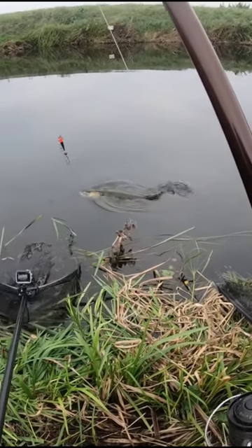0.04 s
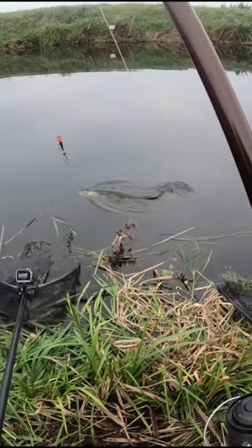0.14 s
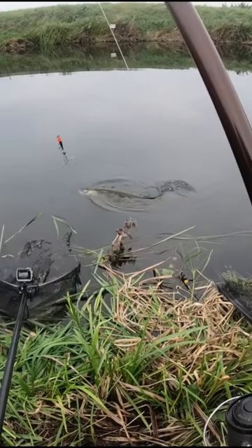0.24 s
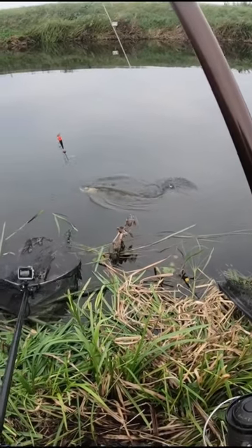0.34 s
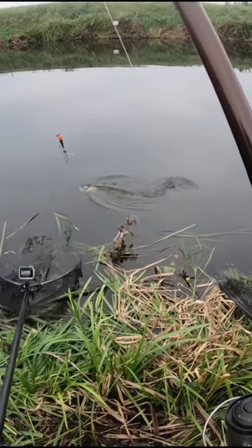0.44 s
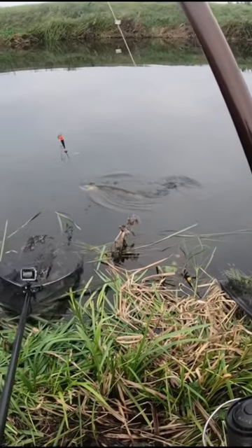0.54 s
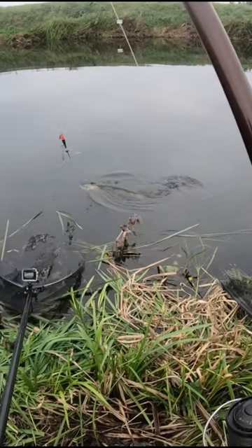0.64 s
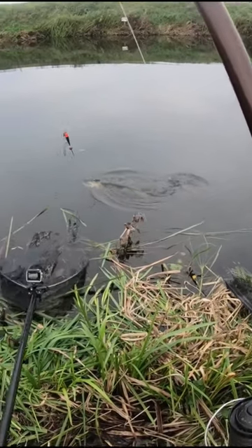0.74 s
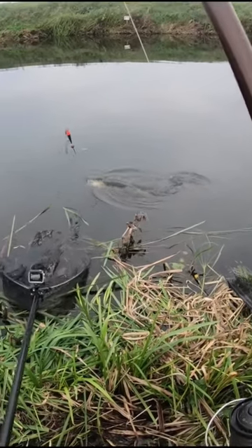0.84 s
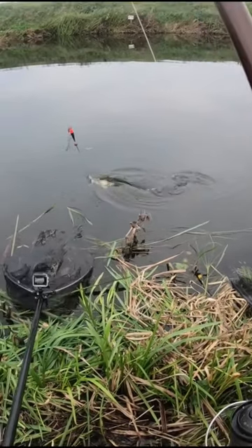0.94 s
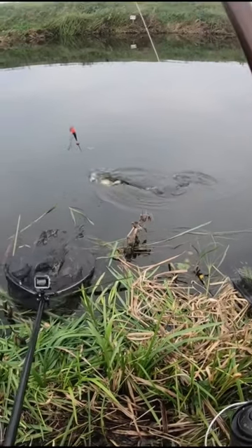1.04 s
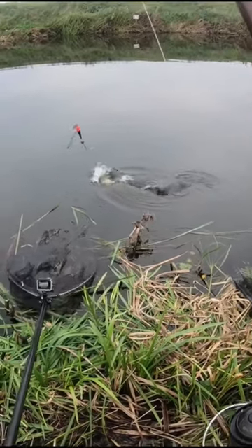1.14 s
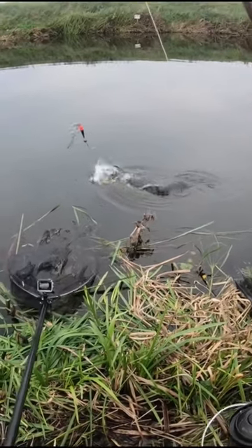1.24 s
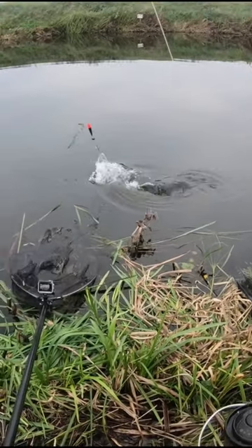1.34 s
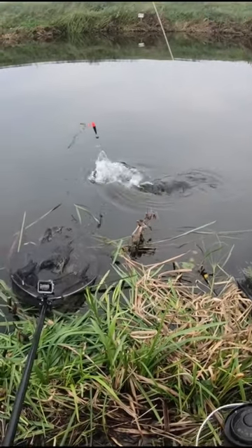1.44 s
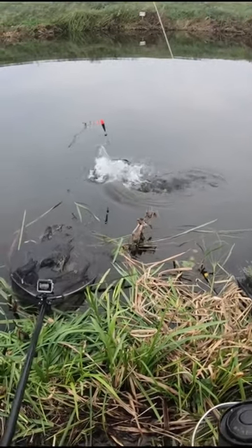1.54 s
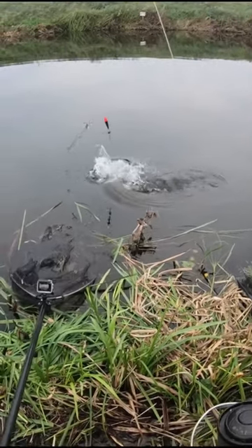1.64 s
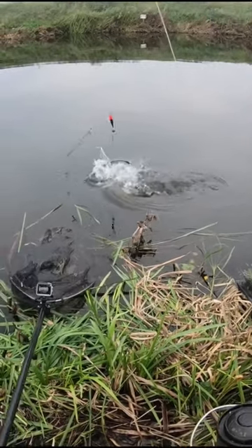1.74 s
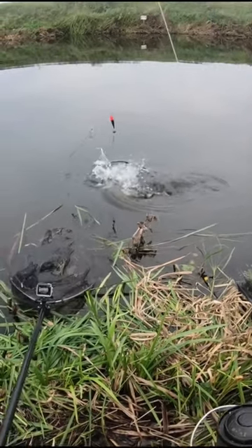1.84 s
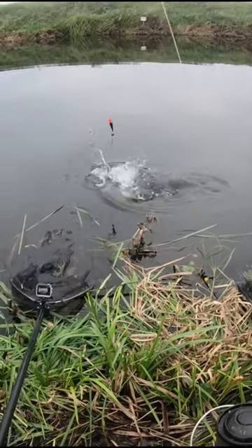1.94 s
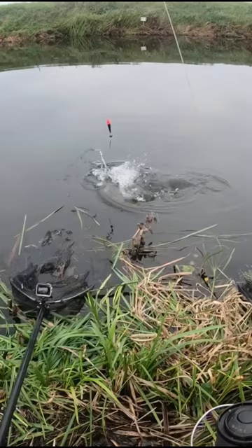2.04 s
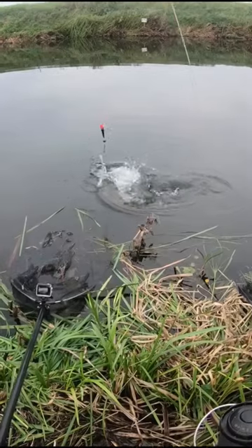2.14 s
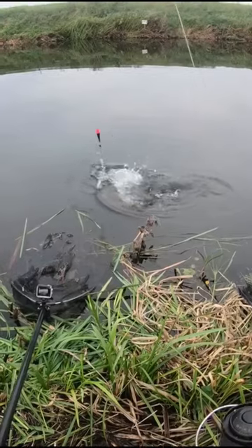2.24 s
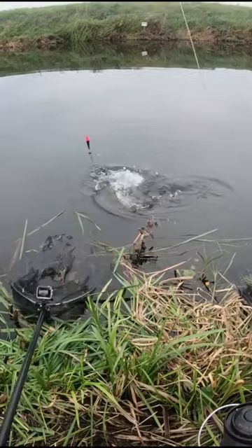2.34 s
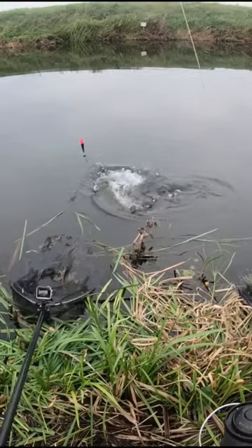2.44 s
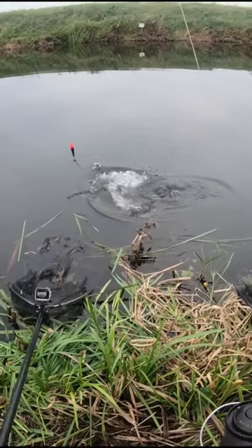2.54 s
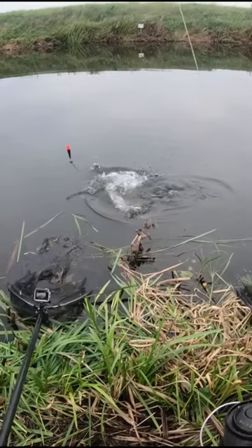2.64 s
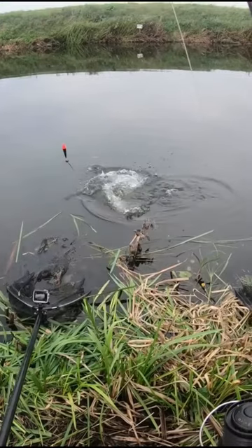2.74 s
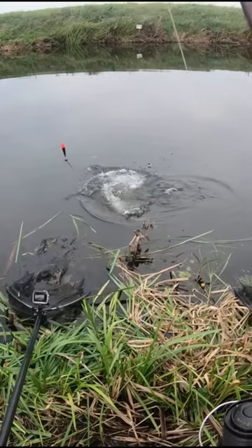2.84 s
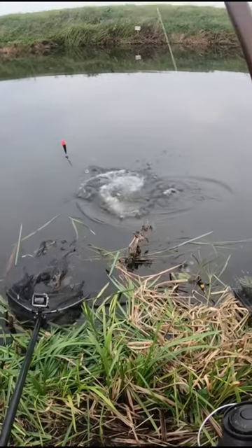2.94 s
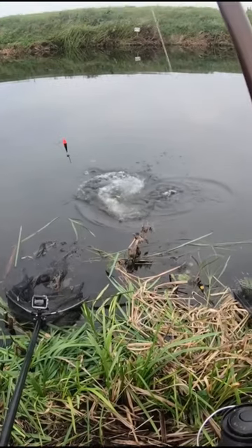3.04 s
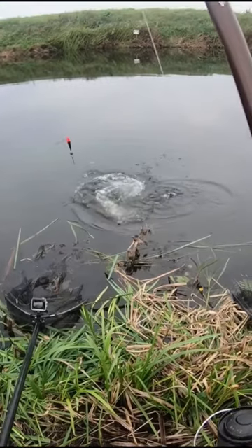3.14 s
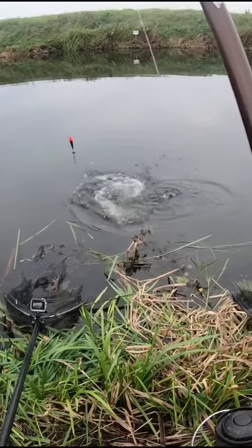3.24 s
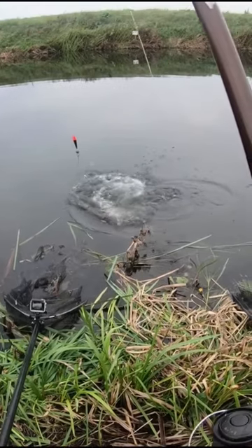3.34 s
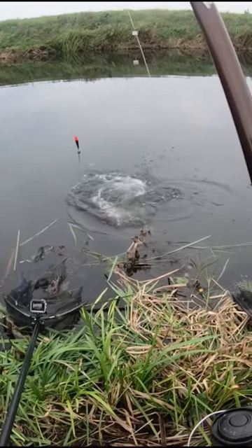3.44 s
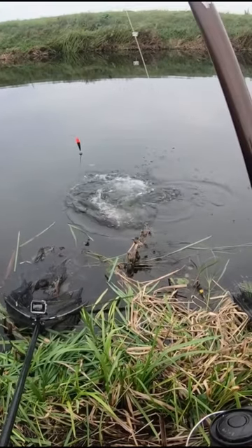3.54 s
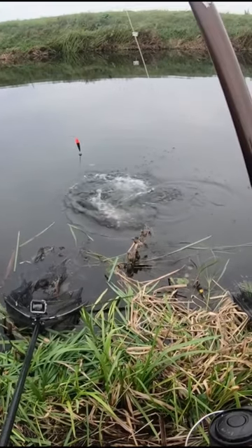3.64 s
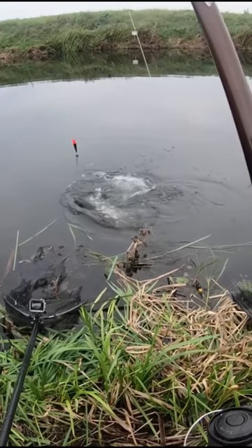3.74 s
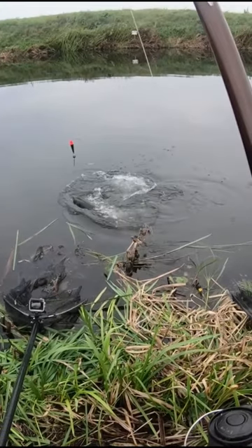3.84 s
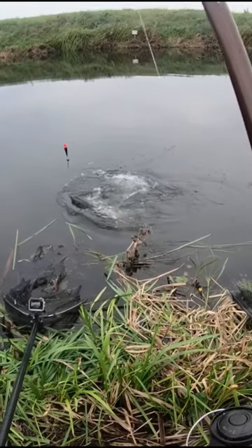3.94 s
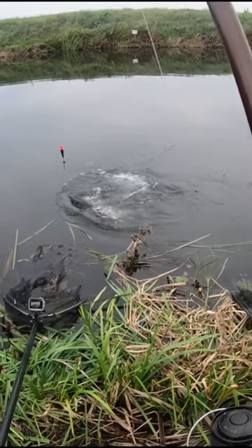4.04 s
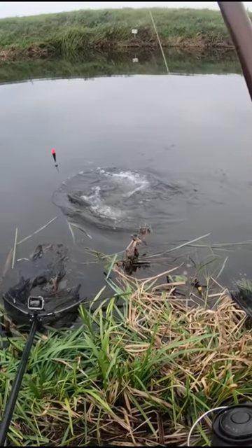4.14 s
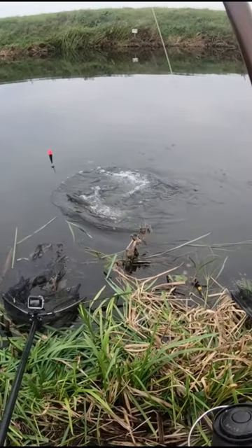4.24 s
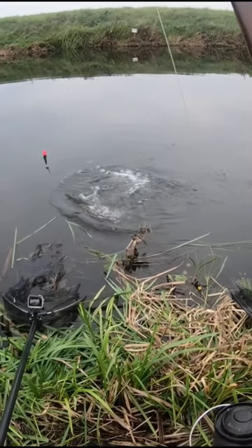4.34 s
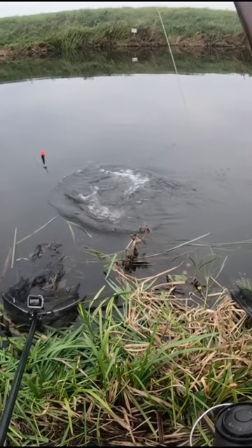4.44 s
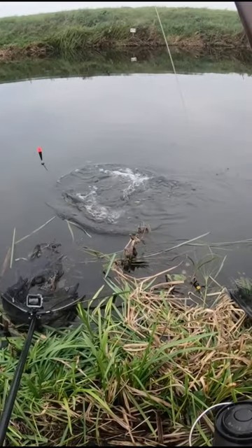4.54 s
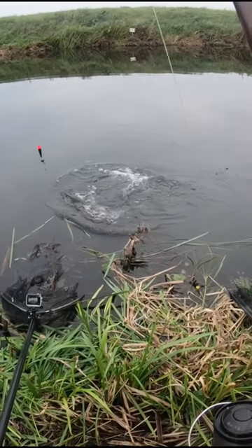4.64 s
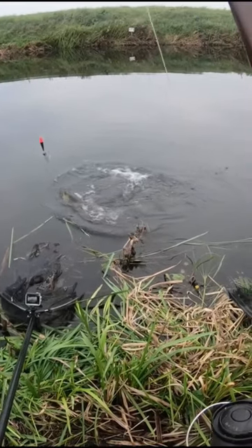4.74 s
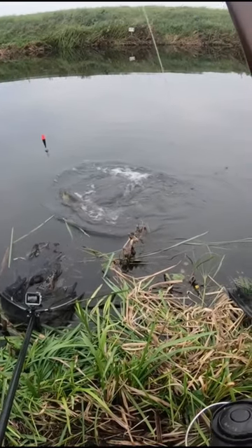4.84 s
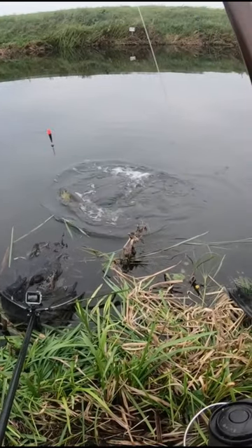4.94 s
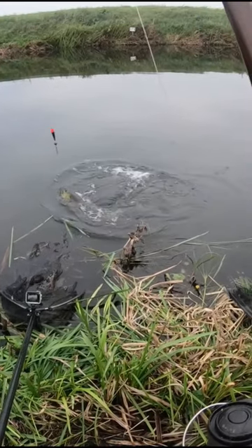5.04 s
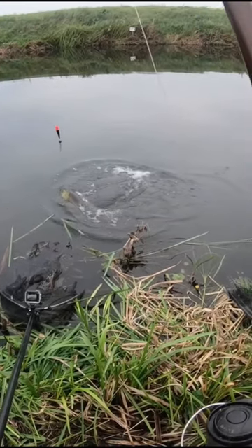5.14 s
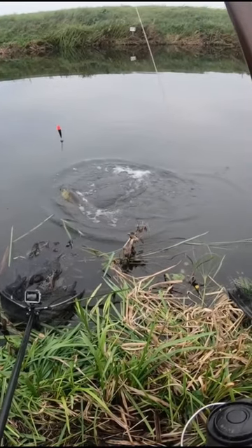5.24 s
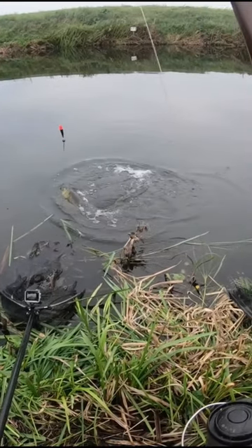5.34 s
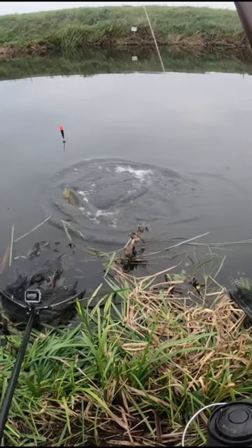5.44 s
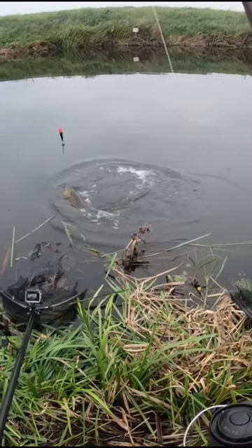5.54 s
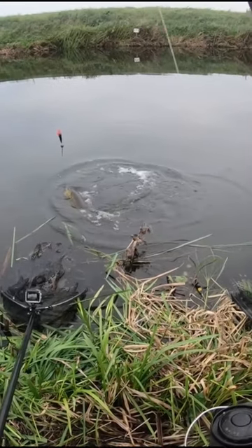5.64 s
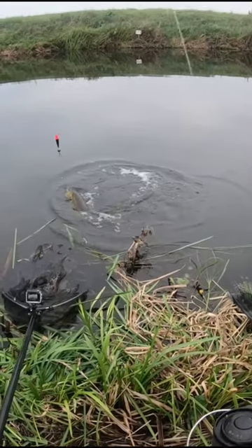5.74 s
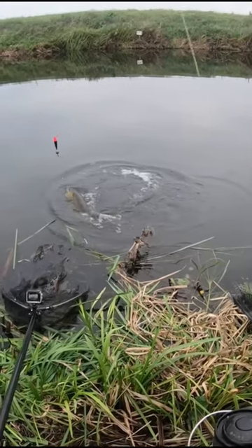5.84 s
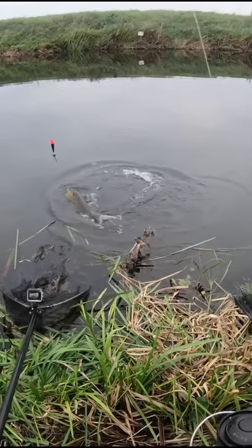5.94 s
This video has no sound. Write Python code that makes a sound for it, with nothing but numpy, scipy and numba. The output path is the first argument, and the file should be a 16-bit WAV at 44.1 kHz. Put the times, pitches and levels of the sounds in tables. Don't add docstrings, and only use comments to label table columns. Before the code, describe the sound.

Boxy, dull water sounds: faint outdoor hush, sudden violent slaps and churning froth from a fish, then bubbling that settles to quiet.

```python
import sys
import numpy as np
from scipy import signal
from scipy.fft import rfft, irfft, next_fast_len
from scipy.io import wavfile
from scipy.ndimage import uniform_filter1d
from numba import njit

SR = 44100
rng = np.random.default_rng(int(sys.argv[2]) if len(sys.argv) > 2 else 0)


def wrap_up_sound(samples):
    columns = np.atleast_2d(samples).T
    tamed = np.clip(columns, -1, 1)
    steps = np.round(tamed * 32767).astype(np.int16)
    wavfile.write(sys.argv[1], SR, steps)


def makeup_ratio(level_db):
    decades = np.asarray(level_db, float) / 20
    return 10 ** decades


N = 264159
TIME = np.arange(N) / SR
SIZE = 2 * next_fast_len(N // 2 + 1)
HZ = np.maximum(np.fft.rfftfreq(SIZE, 1 / SR), .1)

# (frequency [Hz], level per Hz [dB])
HOUSING = [(18, -31), (32, -3), (95, -4), (130, -11), (165, -9), (277, -12.5), (324, -21), (385, -14),
           (467, -20.5), (868, -17.5), (1050, -29.5), (1490, -26.5), (1810, -29), (2070, -42),
           (3050, -53.5), (3600, -56), (4000, -65.5), (4250, -72), (4500, -105)]
# (frequency [Hz], level per Hz [dB])
TREBLE = [(6000, -70), (7700, -32), (8000, -14), (9900, -10), (10200, 0), (10600, -3), (10900, -9),
          (11100, -4), (11700, -18), (12000, -32), (12500, -14), (12900, -7), (13200, -12), (13650, -5),
          (14400, -16)]


def along(table):
    hz, value = np.transpose(table)
    return np.interp(np.log(HZ), np.log(np.maximum(hz, 1)), value)


def causal(table):
    cepstrum = irfft(along(table) * np.log(10) / 20, SIZE)
    cepstrum[1:SIZE // 2] *= 2
    cepstrum[SIZE // 2 + 1:] = 0
    return np.exp(rfft(cepstrum))


def shaped(x, response):
    return irfft(rfft(x, SIZE) * response, SIZE)[..., :N]


def level(x, db):
    return x * makeup_ratio(db) / np.sqrt(np.mean(x ** 2))


def walk(rate):
    k = int(SR / rate)
    held = np.repeat(rng.standard_normal(N // k + 1), k)
    steps = uniform_filter1d(uniform_filter1d(held, k), k)[:N]
    return steps / steps.std()


def tents(s, db, rise, fall):
    late = TIME[::32] - np.array(s)[:, None]
    slope_db = np.where(late < 0, -rise * late, fall * late)
    gain = makeup_ratio(np.array(db)[..., None] - slope_db)
    total = np.sqrt(np.sum(gain ** 2, axis=-2))
    return uniform_filter1d(np.repeat(total, 32, axis=-1), 64)[..., :N]


def hush():
    # (frequency [Hz], level per Hz [dB])
    air_shape = [(22, -16.5), (31, -1.5), (45, -2), (56, -16.5), (75, -19), (130, -34), (190, -28.5),
                 (260, -31.5), (400, -38), (700, -40), (1200, -41.5), (1550, -37), (2000, -48.5),
                 (3000, -55.5), (3700, -71.5), (4500, -74)]
    # (frequency [Hz], likeness [-1 to 1])
    air_alike = [(40, .1), (100, -.1), (180, -.5), (300, -.5), (520, -.1), (890, .5), (1520, .3), (2600, 0)]
    alike = along(air_alike)
    colour = makeup_ratio(along(air_shape))
    mid = shaped(rng.standard_normal(N), colour)
    side = shaped(rng.standard_normal(N), colour * np.sqrt((1 - alike) / (1 + alike)))
    air = np.array([mid + side, mid - side]) * makeup_ratio(-53 + .6 * walk(3)) / mid.std()
    hiss = shaped(rng.standard_normal((2, N)), makeup_ratio(np.maximum(along(TREBLE), -13) / 8))
    return air + level(hiss, -96)


@njit
def ring(n, s, hz, size, swell, t60, rise):
    out = np.zeros(n)
    for k in range(len(s)):
        start = int(s[k] * SR)
        z, step = 1 + 0j, 2 * np.pi * hz[k] / SR
        fade, climb = np.exp(-np.log(1000) / (t60[k] * SR)), 2 ** (rise[k] / SR)
        grow = max(swell[k] * SR, 1.)
        for i in range(min(int(grow + 1.4 * t60[k] * SR), n - start)):
            if i % 8 == 0:
                turn = np.exp(1j * min(step, 2.8))
            z *= turn if i < grow else turn * fade
            step *= climb
            out[start + i] += size[k] * z.imag * np.sin(np.pi / 2 * min(i / grow, 1.)) ** 2
    return out


def gurgles():
    # (time [s], start pitch [Hz], peak level [dB], life [s], rise [octaves/s])
    slow_pockets = [(.0, 172, -59.5, .165, 6.3), (.0, 505, -64.5, .065, 5), (.908, 390, -39, .018, 5),
                    (1.186, 600, -36, .024, 30), (1.253, 224, -36, .022, 10), (1.268, 215.4, -35, .03, 14),
                    (1.283, 330, -36, .018, 14), (1.8, 66, -38, .13, 2.5), (2.03, 225, -40, .07, 6.8),
                    (2.2, 183, -45, .08, 3), (2.395, 180, -39, .062, 12), (2.93, 260, -52, .05, 4),
                    (3.57, 205, -59, .1, 2.5), (3.755, 815, -53, .028, 3), (3.932, 371, -61, .075, 3),
                    (4.03, 178.5, -57, .06, .7), (4.095, 182, -59, .075, 3), (4.15, 215, -64, .05, 3.3),
                    (4.49, 302, -67, .04, 50), (4.7, 20, -38, .36, 0.11), (5.47, 40, -52, .2, 1.2)]
    lean, flat = .7, .8
    out = np.zeros(N)
    for s, hz, db, life, rise in slow_pockets:
        t = np.arange(int(life * SR)) / SR
        shape = np.sin(np.pi * (t / life) ** lean) ** flat
        tone = np.sin(2 * np.pi * np.cumsum(hz * 2 ** (rise * t)) / SR)
        start = int(s * SR)
        out[start:start + len(t)] += makeup_ratio(db) * shape * tone
    return out


def bubbles():
    # (time [s], start pitch [Hz], peak level [dB], T60 [s], rise [octaves/s])
    large = [(.0, 841, -55, 0.077, 0.77), (.97, 1397, -39, 0.04, 3.7), (1.113, 554, -29.5, .016, 80),
             (1.139, 583, -30, 0.024, 40), (.932, 517, -38.5, .015, 79), (1.233, 1486, -41.5, 0.033, 3),
             (1.286, 1474, -39.5, 0.025, 3), (1.349, 544, -31, .018, 70), (2.69, 955, -42, 0.04, 40),
             (2.888, 702, -46.5, 0.084, 13), (3.139, 542, -48, 0.077, 95), (3.153, 600, -51.5, 0.05, 95),
             (3.228, 165, -58.5, 0.046, 6.8), (3.355, 1315, -50.5, 0.032, 140),
             (3.459, 181, -58, 0.051, 4.3), (2.902, 1295, -47, .02, 50), (2.062, 650, -39.5, .025, 30),
             (2.557, 701, -45, 0.022, 40), (4.302, 386, -57.5, 0.037, 3.7), (4.34, 347, -64, 0.073, 6),
             (4.074, 638, -50.5, 0.024, 40), (4.437, 643, -57, 0.037, 60), (4.882, 578, -57.5, 0.1, 11)]
    # (time [s], pitch [Hz], peak level [dB])
    small = [(.455, 902, -62.5), (.845, 390, -60), (.921, 1050, -46), (.956, 1000, -43), (.972, 1130, -43),
             (1.01, 780, -44), (1.598, 503, -41.5), (1.652, 1450, -45.5), (1.742, 1644, -44.5),
             (2.08, 733, -40.5), (2.512, 1430, -51), (2.588, 873, -45.5), (2.622, 637, -46),
             (2.81, 572, -47), (3.178, 630, -55), (3.485, 1490, -65), (3.6, 905, -64), (3.825, 1880, -67),
             (4.29, 1500, -65), (4.43, 1550, -63.5), (.535, 692, -60), (.855, 586, -55),
             (2.182, 1326, -42.5), (3.284, 1494, -52.5), (3.405, 590, -56), (3.51, 770, -58),
             (3.78, 860, -51), (3.31, 870, -58), (3.455, 1780, -59), (4.01, 610, -63), (4.14, 570, -54.5),
             (4.35, 378, -63), (4.527, 1070, -55), (4.548, 746, -56.5), (4.709, 1740, -59.5),
             (5.141, 1550, -55)]
    pop_cycles, pop_rise_oct_per_s, swell_cycles = 40, 8.1, 3.45
    pops = [(s, hz, db, pop_cycles / hz, pop_rise_oct_per_s) for s, hz, db in small]
    s, hz, db, t60, rise = np.transpose(large + pops)
    quick = ring(N, s, hz, makeup_ratio(db), swell_cycles / hz, t60, rise)

    wobble_hz = 90 * (1 + .4 * np.sin(2 * np.pi * 17 * TIME))
    wobble = makeup_ratio(3.6 * np.sin(2 * np.pi * np.cumsum(wobble_hz) / SR))

    dip = 1 - .5 * np.exp(-(np.log2(HZ / 1170) / .18) ** 2)
    return shaped(wobble * quick + gurgles(), dip / (1 + (HZ / 1974) ** 14))


def swell():
    # (time [s], level [dB], left minus right [dB])
    waves = [(.08, -40, -2), (0.25, -32, -5), (0.5, -35, -4), (0.85, -29, -6), (1.05, -23, -9),
             (1.42, -30, -11), (1.63, -28, -5), (1.8, -26, -6), (1.94, -24, -6), (2.2, -24, -5),
             (2.33, -31, -4), (2.54, -34, -7), (2.72, -39, -5), (3.03, -32, -8), (3.18, -37, -6),
             (3.38, -35, -9), (3.55, -30, -7), (3.81, -35, -10), (3.92, -38, -4), (4.14, -33, -7),
             (4.3, -39, -7), (4.47, -38, -8), (4.64, -37, -9), (4.79, -31, -13), (4.95, -30, -10),
             (5.17, -34, -11), (5.36, -33, -12), (5.6, -28, -7), (5.72, -37, -3), (5.9, -39, -5)]
    # (frequency [Hz], level per Hz [dB])
    wave_shape = [(1.5, -12), (4, 0), (12, -2), (17, -8), (22, -20), (30, -45), (60, -90), (300, -180)]
    s, db, pan_db = np.transpose(waves)
    shared, own = shaped(rng.standard_normal((2, N)), makeup_ratio(along(wave_shape)))
    pair = np.array([np.roll(shared, SR // 50) + .5 * own, shared])
    pair = pair / np.sqrt(uniform_filter1d(pair ** 2, SR // 5, axis=1))
    side_db = db + 2.8 + pan_db * np.array([[.5], [-.5]])
    gain = tents(s, side_db, rise=110, fall=110)
    gain = uniform_filter1d(uniform_filter1d(gain, SR // 20), SR // 20)
    return pair * gain * np.minimum(TIME / .03, 1) ** 2


def slaps():
    # (time [s], peak level [dB], pitch of trapped air [Hz], crack level [dB])
    body = [(0.845, -47, 647, -13), (0.91, -33, 422, -12.5), (.921, -38.5, 458, -6),
            (0.933, -37.5, 630, -14.5), (0.946, -28.5, 441, -7), (0.969, -35.5, 815, -6),
            (0.989, -27.5, 590, -12), (1.085, -23.5, 595, -17.5), (1.097, -31, 728, -11.5),
            (1.141, -36.5, 646, -0.5), (1.189, -36, 595, -4), (1.229, -24, 594, -10),
            (1.275, -28, 558, -6.5), (1.288, -30.5, 398, -5), (1.35, -27.5, 648, -8.5),
            (1.458, -47.5, 820, 4), (1.499, -42, 752, -9.5), (1.557, -40, 514, -13),
            (1.739, -39.5, 700, -10.5), (1.77, -54, 624, -8.5), (1.788, -45.5, 637, 1.5),
            (1.801, -61, 3480, 16.5), (1.882, -40.5, 477, -6), (2.025, -41.5, 746, -2.5),
            (2.062, -38.5, 603, -10), (2.085, -40.5, 756, -7), (2.141, -41.5, 775, -10),
            (2.221, -32, 574, -12), (2.33, -51, 800, 9), (2.398, -53, 588, -6), (1.208, -40, 795, 0),
            (1.259, -32, 418, -9.5), (1.58, -42, 517, -4), (1.632, -41, 601, -0.5),
            (1.929, -45.5, 404, -3.5), (1.971, -42.5, 899, -8.5), (2.174, -41, 518, -4)]
    # (time [s], peak level [dB], pitch of trapped air [Hz], crack level [dB])
    falling = [(2.524, -35, 560, -10), (2.558, -46.5, 816, -1), (2.577, -41.5, 915, -6.5),
               (2.615, -45.5, 774, 4.5), (2.666, -41.5, 925, -3), (2.742, -40.5, 394, -11),
               (2.814, -44, 546, -6), (2.85, -51.5, 644, 7), (2.904, -44.5, 770, 5),
               (2.996, -44, 780, -18.5), (3.089, -49, 606, -0.5), (3.142, -49, 720, -12),
               (3.284, -53, 464, -5), (3.357, -60, 1690, 8.5), (3.509, -54, 490, -9.5),
               (3.565, -61, 760, -9.5), (3.688, -61.5, 780, 5), (3.931, -48.5, 417, -0.5),
               (3.997, -66.5, 1520, 6), (4.039, -50, 580, -10)]
    s, db, hz, crack_db = np.transpose(body + falling)
    counts = [len(body), len(falling)]
    t60 = np.repeat([.02, .055], counts)
    tick_db = np.repeat([-39, -38.5], counts)
    spray_db = crack_db + tick_db + 1.5 * np.resize(rng.standard_normal(size=50), len(s))

    same = np.ones_like(s)
    out = ring(N, s, hz, makeup_ratio(db - 3.5), .0015 * same, t60, 6.1 * same)
    crack = causal(HOUSING) / (1 + (450 / HZ) ** 4) / (1 + (HZ / 2600) ** 3)
    for colour, gain_db, fade_s in ((crack, db + crack_db, .0035), (causal(TREBLE), db + spray_db, .004)):
        blows = np.zeros(N)
        blows[(s * SR).astype(int)] = makeup_ratio(gain_db)
        blows = uniform_filter1d(blows, size=65, origin=-32)
        puffs = signal.lfilter([1], [1, -np.exp(-1 / (fade_s * SR))], blows)
        colour = colour / np.sqrt(np.mean(np.abs(colour) ** 2))
        out = out + shaped(puffs * rng.standard_normal(N), colour)
    return out


def grains(lo_hz, hi_hz, count, cycles, spread_db, glide, wash_db, patchy_db, colour):
    when, pitch, big, long = rng.random((count, 4)).T
    hz = lo_hz * (hi_hz / lo_hz) ** pitch
    t60 = cycles * (.45 + 1.25 * long) / hz
    size = hz * makeup_ratio(-spread_db * np.log(np.maximum(big, .02)))
    cloud = ring(N, when * N / SR, hz, size, .5 / hz, t60, glide / t60)
    band = colour / (1 + (lo_hz / HZ) ** 8) / (1 + (HZ / hi_hz) ** 8)
    cloud = level(shaped(cloud, band), 0)
    wash = level(shaped(rng.standard_normal(N), band), 0)
    ends = np.clip(np.minimum(TIME, TIME[::-1]) / .004, 0, 1)
    return level((cloud + makeup_ratio(wash_db) * wash) * makeup_ratio(patchy_db * walk(22.03)) * ends, 0)


def lulls():
    # (time [s], depth [dB], width [s])
    breaths = [(0.927, 13, 0.0055), (.94, 5, 0.0028), (1.003, 5, .003), (1.064, 5, .004), (1.078, 7, .005),
               (1.106, 12, .005), (1.127, 7, .004), (1.137, 6, .003), (1.163, 6.5, 0.0034),
               (1.182, 6.5, .005), (1.223, 4.5, .003), (1.245, 3, .004), (1.27, 5, .004), (1.343, 5, .007),
               (1.57, 3.5, 0.011), (1.72, 3, 0.0076), (1.96, 3.5, 0.0084), (2.055, 4, 0.0052),
               (2.21, 4.5, 0.0054), (2.265, 6, 0.013), (2.32, 6.5, .006), (2.5, 2, .015), (2.548, 5, .008),
               (2.603, 5, .005), (2.735, 8, 0.0081), (2.838, 4.5, .008), (2.875, 3.5, 0.0055),
               (2.985, 6.5, .01), (3.06, 3, 0.017), (3.12, 4.5, 0.013), (3.27, 1.5, .012), (3.34, 3, .012),
               (3.385, 3, 0.011), (3.47, 2.5, 0.026), (3.73, 1.5, .02), (3.9, 4, .02)]
    db = np.zeros(N)
    for s, depth_db, width in breaths:
        near = slice(int((s - .1) * SR), int((s + .1) * SR))
        db[near] -= depth_db * np.exp(-((TIME[near] - s) / width) ** 2)
    return makeup_ratio(db)


def churn():
    # (time [s], churn level [dB], depth [dB]); deep strokes gulp, shallow ones froth
    effort = [(0.0, -79.5, 3), (0.89, -78, -6.5), (0.955, -43, -14.5), (1.001, -47, 0.5), (1.06, -50, -1),
              (1.101, -40.5, -4), (1.249, -35.5, 1), (1.37, -39.5, -1), (1.56, -50, 6.5), (1.61, -43, 1.5),
              (1.93, -47, 2.5), (2.199, -46.5, 5.5), (2.35, -49.5, -3.5), (2.98, -53, 1.5),
              (3.2, -61.5, 1.5), (3.42, -62.5, 0), (3.64, -64.5, 0.5), (3.9, -74, -1.5), (4.05, -63.5, -3)]
    # (time [s], level [dB], brightness [dB])
    tail_beats = [(0.859, -55, -11), (.915, -49, -9.5), (.952, -46, -2), (0.981, -37.5, -10.5),
                  (1.135, -47, 5), (1.2, -37, 2.5), (1.28, -38, 2), (1.354, -43.5, 0), (1.6, -46, -8.5),
                  (1.738, -43.5, 3), (1.85, -41, -5.5), (2.082, -42.5, -9.5), (2.17, -49, 0.5),
                  (2.228, -41, -5), (2.439, -58.5, 14.5), (2.63, -49.5, 10.5), (2.699, -47, 0.5),
                  (2.8, -51, 2.5), (2.9, -54.5, 1), (3.149, -54.5, 0.5), (3.32, -72.5, 17), (3.79, -73, 13),
                  (3.94, -67.5, 12), (4.26, -63, -2), (4.33, -65.5, 7.5), (4.5, -62.5, 3)]
    # (time [s], level [dB])
    body_rolls = [(1.06, -46.5), (1.159, -31.5), (1.221, -41.5), (1.279, -28), (1.361, -29.5), (1.549, -32),
                  (1.631, -33), (1.76, -34), (1.87, -32.5), (1.919, -33), (2.13, -37.5), (2.221, -43),
                  (2.421, -43), (2.55, -50.5), (2.75, -50), (2.9, -49.5), (3.021, -53), (3.162, -53.5),
                  (3.281, -64)]
    s, db, depth_db = np.transpose(effort)
    depth_db = np.interp(TIME, s, depth_db)
    settle_db = 13.5 * np.maximum(TIME - s[-1], 0)
    db = np.interp(TIME, s, db, left=-200) - settle_db

    fizz_db = -9.5
    s, beat_db, bright_db = np.transpose(tail_beats)
    beats, bright = tents(s, [beat_db, beat_db + bright_db + fizz_db], rise=501.5, fall=313.5)
    rolls = tents(*np.transpose(body_rolls), rise=138, fall=148)
    dips = lulls()
    gulping = np.hypot(makeup_ratio(db + depth_db), makeup_ratio(-14) * rolls)
    frothing = np.hypot(makeup_ratio(db), beats) * dips
    fizzing = np.hypot(makeup_ratio(fizz_db - 49 + .9025 * (db + 50)), bright) * dips

    case = causal(HOUSING)
    heave = grains(33.4, 154.4, count=500, cycles=6.6, spread_db=0, glide=.22,
                   wash_db=-3.5, patchy_db=-.6, colour=case)
    gulp = grains(120.2, 340.6, count=900, cycles=13.4, spread_db=3.5, glide=1,
                  wash_db=-3, patchy_db=2.5, colour=case)
    froth = grains(308, 1271, count=3600, cycles=13, spread_db=3, glide=.19,
                   wash_db=-2.5, patchy_db=2, colour=case)
    fizz = grains(1093, 5200, count=7000, cycles=10, spread_db=3.5, glide=.48,
                  wash_db=-3.5, patchy_db=2.5, colour=case)
    spray = grains(6900, 13000, count=9000, cycles=9, spread_db=3.5, glide=.04,
                   wash_db=-6, patchy_db=4.5, colour=causal(TREBLE))
    sizes = ((heave, rolls), (gulp, gulping), (froth, frothing), (fizz, fizzing), (spray, fizzing * makeup_ratio(-30)))
    shared, left, right = (sum(gain * makeup_ratio(-2.5) * np.roll(water, k * N // 3) for water, gain in sizes)
                           for k in range(3))
    return shared, np.array([left, right])


def ports(shared, own):
    # (frequency [Hz], left minus right [dB])
    tilt_db = [(60, -4.5), (140, -6), (210, -5), (320, 2), (490, 1.5), (740, -1.5), (1130, 0), (1710, 1.5),
               (2600, 0.5)]
    # (frequency [Hz], lead of the left port [radians])
    lead = [(60, .35), (110, .45), (180, .85), (300, 1.45), (520, .3), (1030, .1), (1290, -.2), (1550, .5),
            (1810, -.9), (2410, -1.5), (3000, 0)]
    # (frequency [Hz], share that differs between the ports [0-1])
    apart = [(60, 0.05), (900, 0.01), (1500, 0.58), (2500, 0.86), (6000, 0.98), (9000, 0.8)]
    half = makeup_ratio(along(tilt_db) / 2) * np.exp(.5j * along(lead))
    loose = np.clip(along(apart), 0, .95)
    pair = np.array([half, 1 / half])
    pair = pair / np.sqrt((1 - loose) * np.abs(pair.mean(axis=0)) ** 2 + loose / 2)
    return shaped(shared, pair * np.sqrt(1 - loose)) + shaped(own, pair * np.sqrt(loose))


def scene():
    shared, own = churn()
    single = slaps() + bubbles()
    return ports(shared + single, own + single) + swell() + hush()


def top_cut(x):
    return signal.sosfilt(signal.butter(12, 14450, fs=SR, output="sos"), x)


def record(dry):
    return top_cut(dry)


dry = scene()
out = record(dry)
wrap_up_sound(out)
```